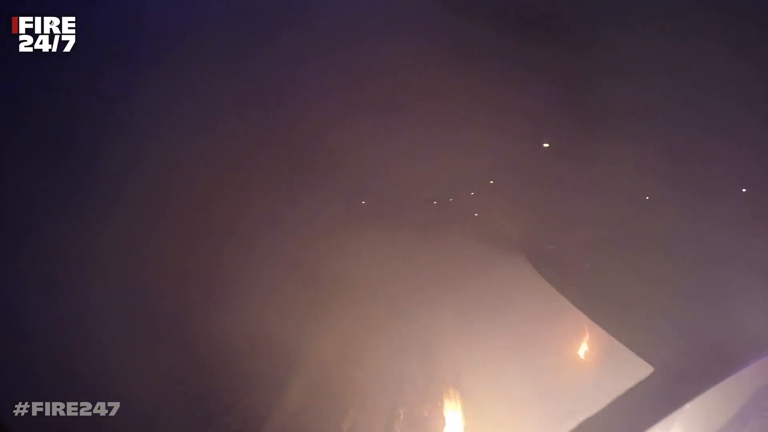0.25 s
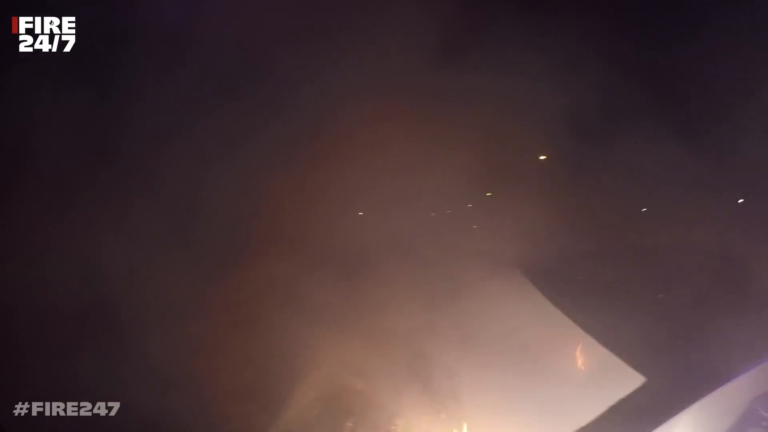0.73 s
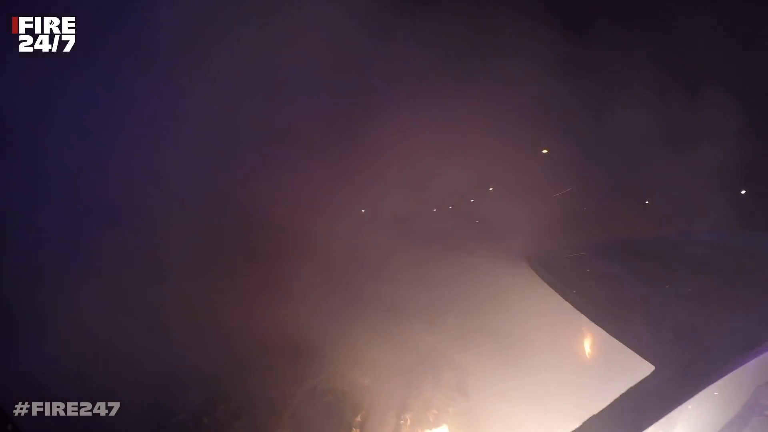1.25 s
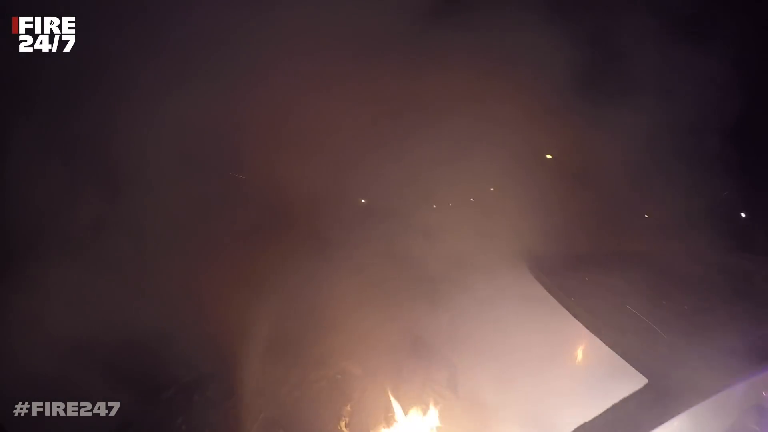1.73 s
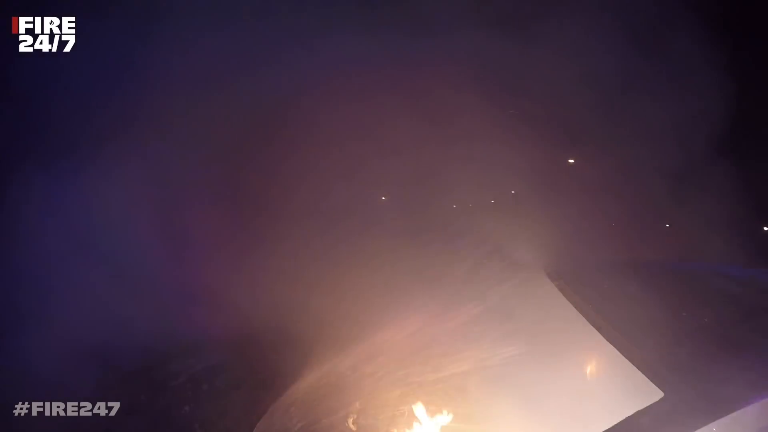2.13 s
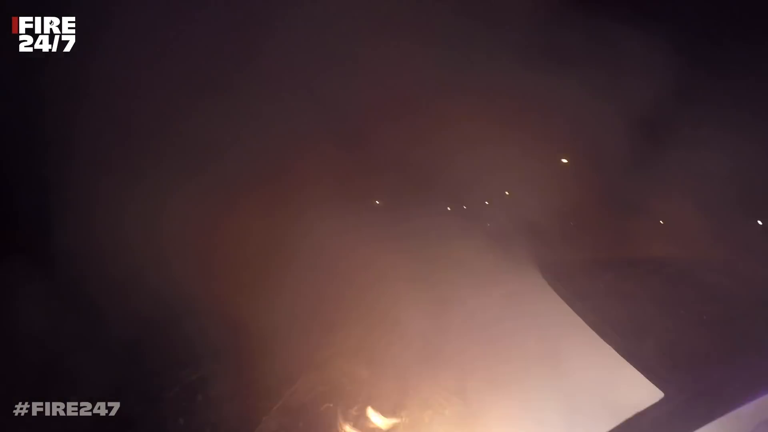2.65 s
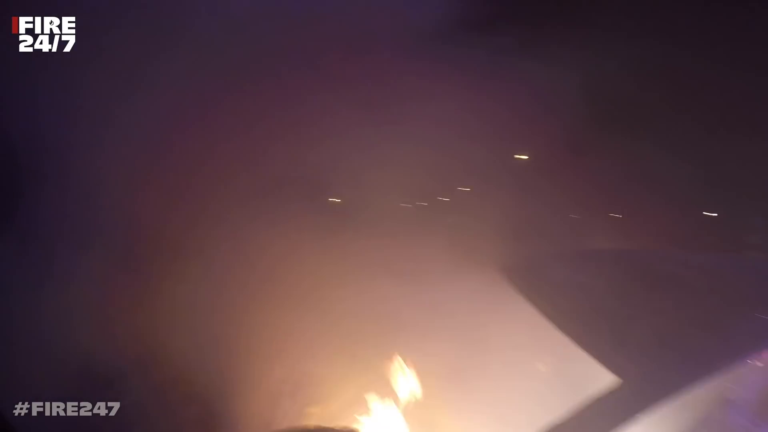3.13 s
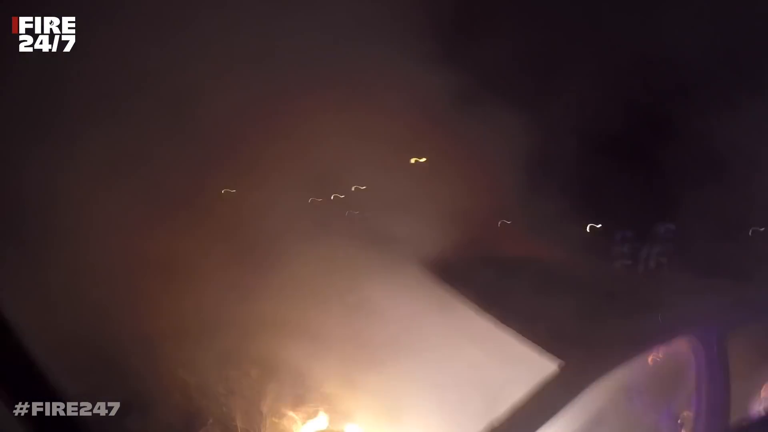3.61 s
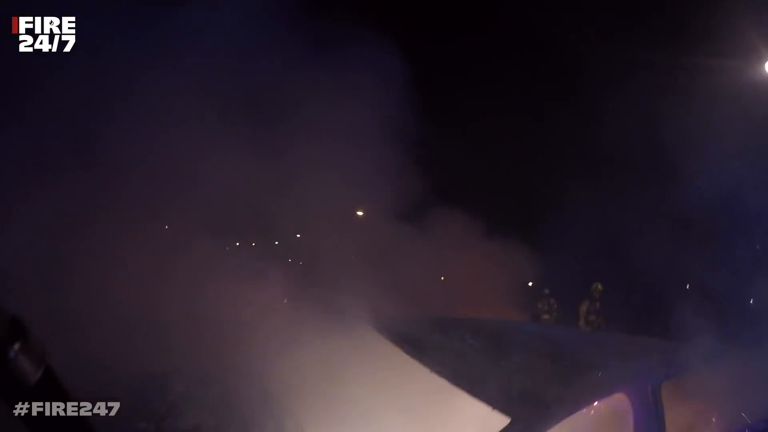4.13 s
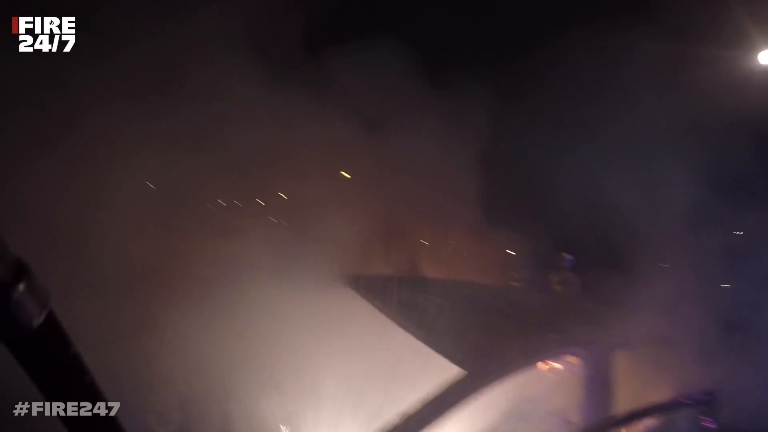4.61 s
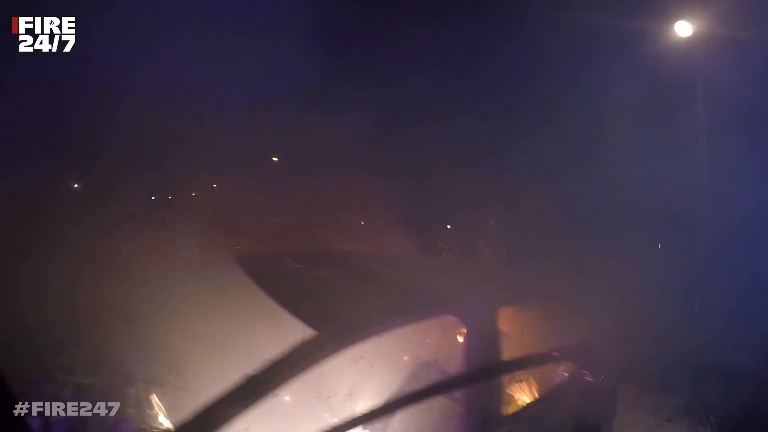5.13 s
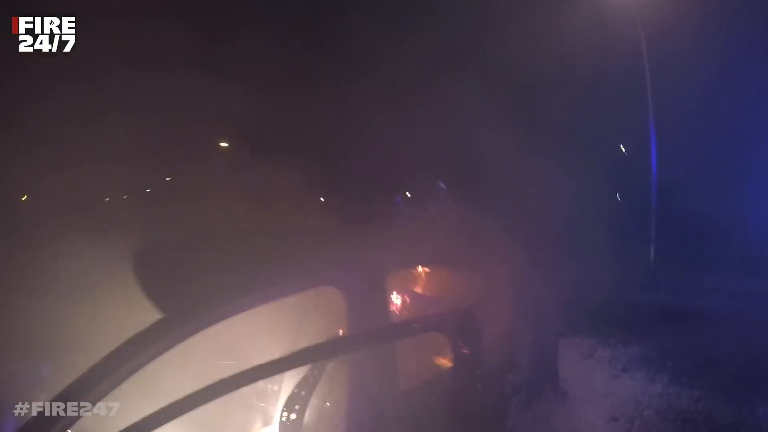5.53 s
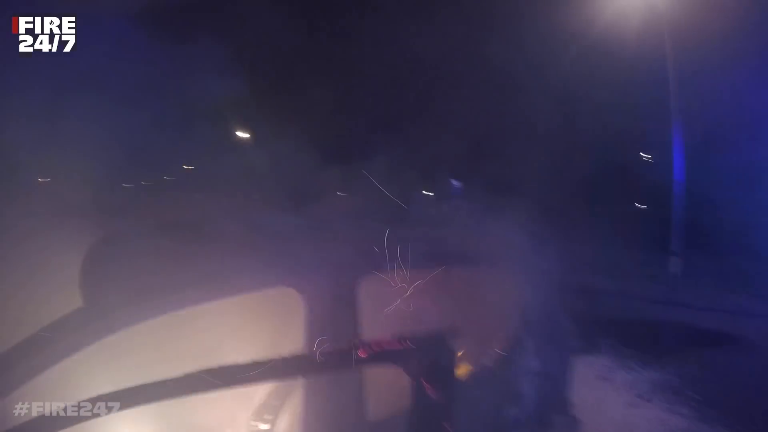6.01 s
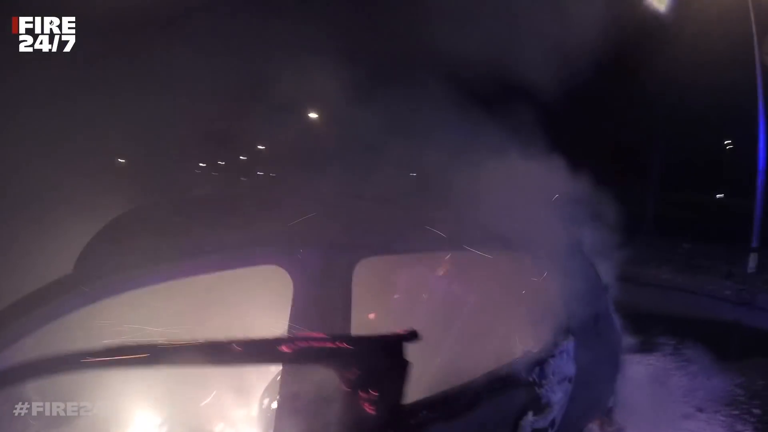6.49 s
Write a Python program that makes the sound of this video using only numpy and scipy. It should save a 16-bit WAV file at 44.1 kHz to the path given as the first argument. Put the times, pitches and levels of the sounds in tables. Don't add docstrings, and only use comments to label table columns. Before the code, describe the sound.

A hose jet sprays a burning car outdoors, heard through a sealed case worn close by. Dense drops drum on hot sheet metal and hiss into steam, surging and shifting in tone. Soft bumps and low rumble accompany it; sharp water slaps land early on. Midway the sound briefly drops out, then hard knocks and heavier thuds jolt the case while the spraying continues.

```python
import sys
import numpy as np
from scipy import signal
from scipy.fft import rfft, irfft, next_fast_len
from scipy.io import wavfile
from scipy.ndimage import uniform_filter1d

SR = 44100
rng = np.random.default_rng(int(sys.argv[2]) if len(sys.argv) > 2 else 0)


def transcribe(signal):
    frames = np.atleast_2d(signal).T
    limited = np.clip(frames, -1, 1)
    pcm = np.round(limited * 32767).astype(np.int16)
    wavfile.write(sys.argv[1], SR, pcm)


def nominal_scale(level):
    x = np.asarray(level, float) / 20
    return 10 ** x


N = 298116
M = next_fast_len(N + 4096)
T = np.arange(M) / SR
HZ = np.maximum(np.arange(M // 2 + 1) * SR / M, 1.)
COARSE_S = np.arange(0, 7, .002)


def unit(x):
    return x / np.sqrt(np.mean(x ** 2))


def walk(rate_hz):
    hold = int(SR / rate_hz)
    steps = np.repeat(rng.standard_normal(M // 100), hold)[:M]
    return unit(uniform_filter1d(uniform_filter1d(steps, hold), hold))


def curves(table):
    s, *columns = np.transpose(table)
    return [uniform_filter1d(np.interp(T, s, column), size=1800) for column in columns]


def swells(events):
    total = 0
    for s, half_s, *sizes in events:
        total = total + np.outer(sizes, np.exp(-((COARSE_S - s) / half_s) ** 2))
    return [np.interp(T, COARSE_S, column) for column in total]


def causal(db):
    cepstrum = irfft(np.log(nominal_scale(db)), M)
    cepstrum[1:M // 2] *= 2
    cepstrum[M // 2 + 1:] = 0
    return np.exp(rfft(cepstrum))


def hill(hz, width_hz):
    return 1 / (1 + (2 * (HZ - hz) / width_hz) ** 2)


def ring(modes, length_s=.25):
    t = T[:int(length_s * SR)]
    return sum(nominal_scale(db) * np.sin(2 * np.pi * hz * t) * 1000. ** (-t / t60_s) for hz, db, t60_s in modes)


def add(out, s, sound):
    i = int(s * SR)
    out[i:i + len(sound)] += sound[:M - i]


# (frequency [Hz], level [dB])
WATER_COLOUR = [(150, -8.5), (300, -11.5), (600, -15.5), (1000, -6.5), (1500, -9.5), (2500, -6.5),
                (4000, -17), (5500, -20), (8000, -31.5), (11000, -31.5), (15500, -38)]


def through_case(x, modes):
    hz, colour_db = np.transpose(WATER_COLOUR)
    db = np.interp(np.log(HZ), np.log(hz), colour_db)
    for mode_hz, width_hz, mode_db in modes:
        db = db + mode_db * hill(mode_hz, 1.6 * width_hz) ** 1.39
    db = db - 30 * np.log10(1 + (140 / HZ) ** 2)
    return unit(irfft(rfft(x) * causal(db), M))


# (frequency [Hz], width [Hz], level [dB])
CASE_BONNET = [(716, 14, 5.5), (1357, 41, 5), (1966, 1240, 9.5), (2462, 197, -10.5), (2944, 128, 9),
               (3418, 440, 16.5), (4410, 200, -2), (4840, 450, 9.5), (5530, 150, -15.5), (5770, 216, -10.5),
               (6970, 490, 9), (8480, 230, -1), (9170, 1500, 6)]
# (frequency [Hz], width [Hz], level [dB])
CASE_DOORS = [(688, 59, 6), (1360, 120, 5.5), (1766, 460, 12), (2340, 100, -14.5), (2510, 80, 2),
              (3034, 160, -20), (3460, 960, 16), (4290, 250, 7.5), (5010, 610, -8.5), (5260, 500, 7.5),
              (5990, 150, -16), (6050, 340, 2.5), (9370, 260, 7)]
# (time [s], share turned [0-1])
TURN = [
    (1.8, 0.33),
    (3.0, 0.2),
    (4.3, 0.45),
    (5.3, 0.46),
    (5.7, 0.68),
    (6.4, 0.8),
]


def from_wearer(water):
    turned = np.clip(np.interp(T, *np.transpose(TURN)), 0, 1)
    return (1 - turned) * through_case(water, CASE_BONNET) + turned * through_case(water, CASE_DOORS)


# (time [s], flow [dB], mist [dB], aim at the panel [dB])
STREAM = [(0.0, -4.5, 0.8, 1), (0.39, -4.5, 0, 1.6), (0.6, 3, 0.5, -0.5), (0.91, 2, 0, 1.5),
          (1.16, -0.1, 0, 0.9), (1.64, 1.74, -3.5, -2), (2.24, 2.27, -0.2, -0.5), (2.74, 1.5, -3, -4),
          (2.94, 5.0, -1.5, 4), (3.46, 4, 0.9, 3.1), (3.7, -21, 2.5, 3.5), (3.95, 0.1, 2.0, 0),
          (4.47, -4, 2.8, 0), (4.61, 3.5, 2.4, 0), (5.14, 2.35, 0.5, 2.8), (5.39, 1.3, 3, 0.4),
          (5.84, -3, 0.6, 1.6), (6.76, 1, 0.0, -2.1)]
# (time [s], half length [s], flow [dB], aim [dB])
SURGES = [(0.09, 0.035, -1.5, 0.5), (0.165, 0.029, -1.5, -1.5), (0.804, 0.035, -4, 2.3),
          (1.06, 0.035, 1, -0.2), (1.344, 0.069, -5, 3.2), (1.465, 0.14, 3, -0.6), (1.616, 0.023, 2, 0.1),
          (1.902, 0.1, 2, 0.7), (2.014, 0.066, -1.5, 0.9), (2.142, 0.034, 1.5, -1.3), (2.536, 0.092, -1, 2),
          (2.817, 0.07, -5, 3.5), (2.972, 0.059, -6.5, -0.7), (3.035, 0.018, 2.8, -2.5),
          (3.088, 0.03, -4.4, -3), (3.206, 0.07, 1.3, -4.5), (3.278, 0.07, -4.5, 2.5),
          (4.024, 0.03, 2.0, 1), (4.86, 0.054, -3.5, -2.5), (5.049, 0.026, 1.5, 0.1),
          (5.13, 0.11, -1.5, -4.1), (5.921, 0.053, 5, -3.5), (6.054, 0.065, 2, -1.5),
          (6.394, 0.037, -4.5, 1.5), (3.51, 0.071, 0, -2.5), (3.645, 0.039, 6.5, -2.5),
          (4.66, 0.051, 0.5, 2), (5.29, 0.013, -1, -3), (5.86, 0.027, -2, -1.5), (5.895, 0.019, 1, -0.5)]
# (level [dB], flow slope [dB/dB], mist slope [dB/dB], aim slope [dB/dB])
LAYERS = [
    (-43.5, 0.36, -1.24, -0.1),
    (-41, 0.79, -0.79, -1.06),
    (-31.5, 1.22, -0.32, 1.43),
    (-28, 1.52, 0.21, 0.81),
    (-38, 1.43, -0.27, -0.19),
    (-43, 1.33, 1.4, -0.72),
    (-44, 0.94, 1.12, -1.1),
]


def layer_gains():
    flow_db, mist_db, aim_db = curves(STREAM)
    surge_db, swerve_db = swells(SURGES)
    flow_db, aim_db = flow_db + surge_db, aim_db + swerve_db
    return [nominal_scale(db + a * flow_db + b * mist_db + c * aim_db) for db, a, b, c in LAYERS]


LAYER_EDGES_HZ = [690, 1200, 2400, 4250, 5850, 8300]


def jet():
    drops_per_s, mist_db = 3000, 1.0
    chance = rng.random((2, M))
    drops = (chance[0] < drops_per_s / SR) * nominal_scale(-1.8 * np.log(chance[1] + 1e-9))
    bursts = unit(signal.lfilter([1], [1, -.975], drops))
    surge = nominal_scale(0.56 * walk(45) + 0.59 * walk(26))
    water = (bursts * rng.standard_normal(M) + nominal_scale(mist_db) * rng.standard_normal(M)) * surge
    heard = rfft(from_wearer(water))

    below = [1 / (1 + (HZ / hz) ** 12) for hz in LAYER_EDGES_HZ]
    shares = np.diff([0 * HZ] + below + [1 + 0 * HZ], axis=0)
    wander = [.25, .15, .15, .08, .12, .12, .15]
    flicker_db = [1.03, .9, 0.88, 0.58, 1.0, 1.46, 1.85]
    out = np.zeros(M)
    for share, gain, amount, depth_db in zip(shares, layer_gains(), wander, flicker_db):
        power = share * abs(heard) ** 2
        lean = np.tanh(5.9 * np.log(HZ * np.sum(power) / np.sum(HZ * power)))
        whole = irfft(heard * share, M)
        tilted = irfft(heard * share * lean, M)
        drift = np.tanh(amount * (walk(4.6) + walk(15)))
        out += (whole + drift * tilted) * gain * nominal_scale(depth_db * walk(15)) / np.std(whole)
    return out


# (time [s], half length [s], pitch [Hz], rise [dB])
PARTS = [(0.657, 0.21, 1023, 6.5), (0.86, 0.068, 1800, 8), (0.954, 0.077, 2970, 6),
         (1.042, 0.027, 4730, 10), (1.203, 0.19, 1120, 9.5), (1.802, 0.19, 800, 1.5),
         (2.696, 0.14, 1390, 5.5), (3.01, 0.14, 5450, 5.5), (3.34, 0.14, 890, 8.5),
         (4.427, 0.13, 1260, 5.5), (4.65, 0.17, 643, 6), (4.76, 0.41, 2370, 6), (5.04, 0.038, 7000, 2),
         (5.272, 0.037, 3300, 6.5), (5.42, 0.072, 615, 11.5), (5.595, 0.1, 3180, 2.5),
         (6.51, 0.055, 840, 2.5), (0.028, 0.033, 4850, 8.5), (0.15, .03, 5000, 9), (0.806, .04, 282, 8),
         (1.8, 0.19, 3300, 3), (2.433, 0.052, 3400, 4.5), (2.895, 0.067, 280, 12), (3.045, .025, 6960, 2),
         (3.19, 0.065, 6900, 3), (3.61, 0.019, 3550, 7), (3.882, .04, 285, 10), (5.202, 0.14, 4260, -4.5),
         (5.95, .1, 280, 6)]


def parts(spray):
    width_share = 0.26
    heard = rfft(spray)
    out = spray.copy()
    for s, half_s, hz, db in PARTS:
        lift = nominal_scale(swells([(s, half_s, db)])[0]) - 1
        out += irfft(heard * hill(hz, width_share * hz), M) * lift
    return out


def body_sway(sway_db):
    shape = np.sqrt(hill(6.5, 22) / (1 + (HZ / 95) ** 6) / (1 + (14 / HZ) ** 4))
    noise = rng.standard_normal(M) * nominal_scale(1.3 * walk(16))
    return unit(irfft(rfft(noise) * shape, M)) * nominal_scale(sway_db)


# (time [s], half length [s], rise [dB])
TUGS = [(.05, .05, 8), (.42, 0.032, 9), (.75, 0.028, 4), (1.1, 0.041, -4), (1.38, 0.026, 10),
        (1.62, 0.15, 10), (2.1, 0.22, 12), (2.42, 0.07, 5.5), (2.63, 0.027, 7.5), (3.0, 0.033, 9),
        (3.585, 0.039, 19), (3.86, 0.048, 8), (4.35, 0.03, 7), (4.6, 0.13, 14.5), (4.78, .04, 11),
        (5.02, 0.034, 10), (5.11, .025, 8.5), (5.47, 0.16, 10.5), (5.97, 0.019, 10), (6.08, .03, 13),
        (6.37, 0.022, 18), (6.68, 0.077, 14)]


def strap_boom(sway_db):
    rest_db, follows_db_per_db = -48.5, 0.77
    level_db = rest_db + follows_db_per_db * (sway_db + 37) + swells(TUGS)[0]
    noise = rng.standard_normal(M) * nominal_scale(1.05 * walk(11))
    return unit(irfft(rfft(noise) * hill(108.8, 54) ** 1.65, M)) * nominal_scale(level_db)


# (time [s], sway [dB])
MOVEMENT = [(0, -37.5), (.9, -36), (1.4, -38), (1.7, -37.5), (2.7, -37.5), (3.0, -36), (3.9, -25.5),
            (4.67, -35.5), (5.2, -33.5), (5.6, -30.5), (6.76, -34)]


def rumble():
    sway_db = curves(MOVEMENT)[0]
    return body_sway(sway_db) + strap_boom(sway_db)


# (time [s], level [dB], frequency [Hz], fade [s], first direction [+-1])
THUMPS = [(0.497, -27.5, 54, 0.022, 1), (2.367, -26, 105.6, 0.0072, 1), (3.226, -14, 68, 0.0058, 1),
          (3.705, -7.5, 63.5, 0.007, 1), (3.736, -13, 71, 0.0045, 1), (3.953, -8, 51.3, 0.0098, 1),
          (3.977, -8.5, 29.7, 0.008, 1), (4.302, -21, 34.5, 0.018, -1), (4.535, -20.5, 114.5, 0.0098, 1),
          (5.616, -14, 50, 0.0066, 1), (6.050, -13, 31.3, 0.021, 1), (6.295, -7, 67, 0.0051, 1),
          (6.329, -15, 32.2, 0.017, -1),
          (0.85, -26.8, 33, 0.038, 1), (3.064, -19.0, 27, 0.018, 1), (3.284, -23.6, 23, 0.025, 1),
           (3.554, -19, 21, 0.027, -1), (4.108, -19.5, 25, 0.027, -1), (4.387, -19.5, 29, 0.021, 1),
           (5.467, -20, 20, 0.02, 1), (5.639, -14.5, 38, 0.004, 1), (6.63, -23.1, 16.4, 0.019, -1)]


def thumps():
    out, t = np.zeros(M), T[:SR // 4]
    for s, db, hz, fade_s, sign in THUMPS:
        swell = t / fade_s * np.exp(1 - t / fade_s)
        add(out, s, np.sign(sign) * nominal_scale(db) * swell * np.sin(2 * np.pi * hz * t))
    return out


# (time [s], peak [dB])
SLAPS = [
    (1.4162, -2),
    (1.4374, -1.5),
    (1.6018, -25),
    (3.189, -16),
    (4.0978, -4),
    (4.5998, 7),
    (5.9205, -4),
]
# (frequency [Hz], level [dB], t60 [s])
SLAP_RING = [(1910, -27, 0.03), (2950, -8.5, 0.01), (3180, -7, 0.023)]


def slaps():
    delay_s, spatter, spatter_s = 0.000763, 0.086, 0.0051
    out = np.zeros(M)
    for (s, db), noise in zip(SLAPS, rng.standard_normal((len(SLAPS), 200))):
        blow = spatter * noise * np.exp(-T[:200] / spatter_s)
        blow[0] = 1
        add(out, s + delay_s, nominal_scale(db - 5) * signal.fftconvolve(blow, ring(SLAP_RING, length_s=.03)))
    return signal.sosfilt(signal.butter(3, [1100, 4000], "band", fs=SR, output="sos"), out)


# (time [s], contact [s], crack [dB], dull tap [dB], shell ring [dB], deep boom [dB])
KNOCKS = [
    (3.7040, 0.0052, -17, -20, -24, -23),
    (3.7298, 0.003, -25, -25, -8, -48),
    (4.1846, 0.0067, -3, -4, 1, -3.5),
    (6.2990, 0.0073, -30, -21, -45, -40),
    (6.329, 0.01, -35, -24, -40, -45),
]
# (frequency [Hz], level [dB], t60 [s])
TAP = [(503, -4, 0.022), (685, -5.5, 0.026), (920, 2.5, 0.018), (1122, 0, 0.02)]
# (frequency [Hz], level [dB], t60 [s])
SHELL = [(1460, -18, 0.015), (1740, -14, .012), (2037, -1, 0.017), (2170, 1.5, 0.013), (2114, -18.5, 0.081),
         (2400, -4, 0.019), (2750, -20, 0.0078), (3300, -14, 0.014)]
# (frequency [Hz], level [dB], t60 [s])
BOOM = [(126, 0, 0.093), (174, 1.5, 0.056), (196, -14, 0.068), (288, -8.5, 0.065), (387, -13, 0.048)]


def knocks():
    ring_up_s, boom_up_s, boom_delay_s = .0012, 0.0017, 0.003
    out = np.zeros(M)
    crack = signal.butter(2, [700, 2980], "band", fs=SR, output="sos")
    boom = -ring(BOOM)
    t = T[:len(boom)]
    boom = boom * (1 - np.exp(-t / boom_up_s))
    bodies = [ring(modes) * (1 - np.exp(-t / ring_up_s)) for modes in (TAP, SHELL)]
    for (s, contact_s, *levels_db, boom_db), noise in zip(KNOCKS, rng.standard_normal((8, 800))):
        rattle = signal.sosfilt(crack, noise * np.exp(-(T[:800] / contact_s) ** 4))
        for sound, db in zip([rattle] + bodies, levels_db):
            add(out, s, nominal_scale(db) * sound / np.max(np.abs(sound)))
        add(out, s + boom_delay_s, nominal_scale(boom_db) * boom)
    return out


def scene():
    mono = parts(jet()) + rumble() + thumps() + slaps() + knocks()
    return np.tile(mono[:N], (2, 1))


# (time [s], half width [s], depth [dB])
DIPS = [
    (3.63, 0.017, -23),
    (3.784, 0.0046, -21),
]


def dips(x):
    return x * nominal_scale(sum(db * np.exp(-((T[:N] - s) / half_s) ** 2) for s, half_s, db in DIPS))


def roll_off(x):
    return signal.sosfilt(signal.butter(12, 15500, fs=SR, output="sos"), x)


def record(dry):
    x = dips(dry)
    x = x / (1 + np.abs(x / .95) ** 6) ** (1 / 6)
    return roll_off(x)


dry = scene()
out = record(dry)
transcribe(out)
```